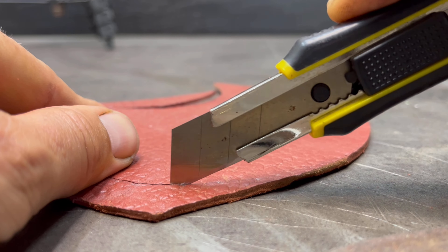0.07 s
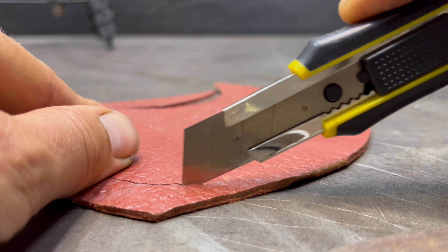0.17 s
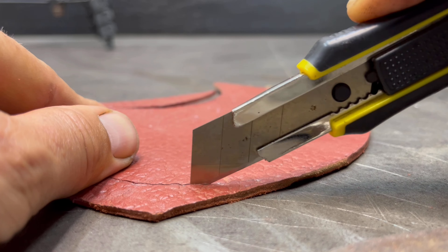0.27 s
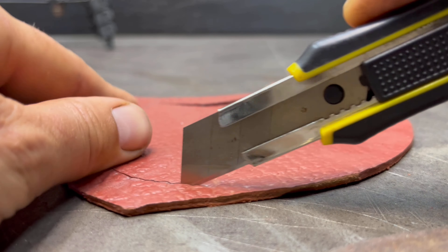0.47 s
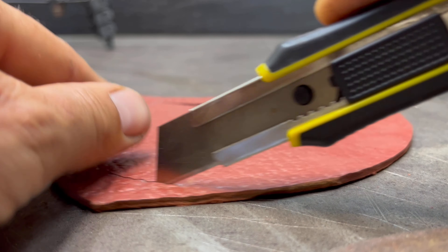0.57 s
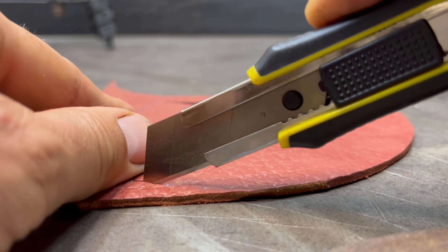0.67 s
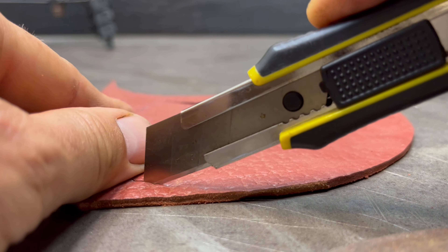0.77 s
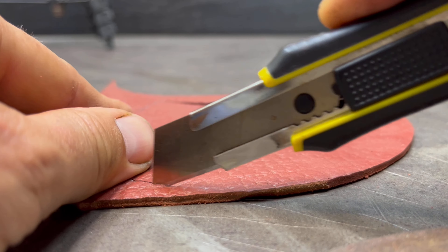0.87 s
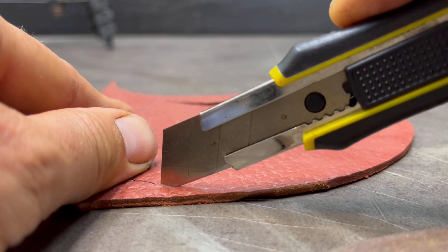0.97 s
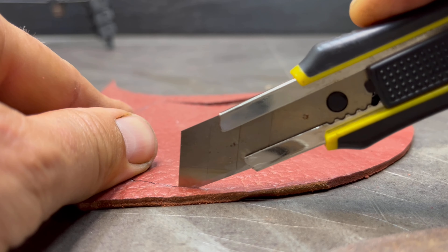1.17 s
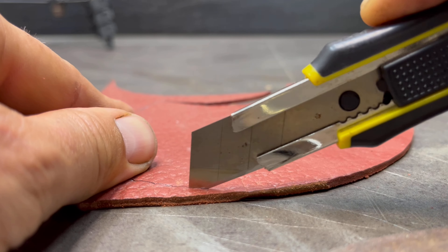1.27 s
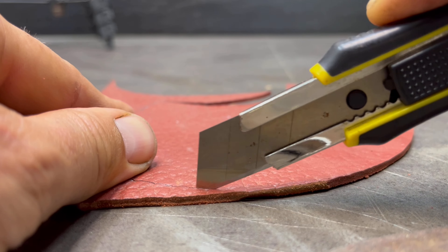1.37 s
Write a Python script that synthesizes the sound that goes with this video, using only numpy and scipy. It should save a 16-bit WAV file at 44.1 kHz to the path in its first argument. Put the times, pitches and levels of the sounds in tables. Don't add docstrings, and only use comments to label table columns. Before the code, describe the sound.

Leather being cut with a utility knife: gritty tearing strokes, hide sliding, a loud blade click

```python
import sys
import numpy as np
from scipy import signal
from scipy.fft import rfft, irfft
from scipy.io import wavfile
from scipy.ndimage import uniform_filter1d

SR = 44100
rng = np.random.default_rng(int(sys.argv[2]) if len(sys.argv) > 2 else 0)


def file_out(sig):
    cols = np.atleast_2d(sig).T
    lim = np.clip(cols, -1, 1)
    pcm = np.round(lim * 32767).astype(np.int16)
    wavfile.write(sys.argv[1], SR, pcm)


def elevation(decibels):
    levels = np.asarray(decibels, float)
    return 10 ** (levels / 20)


N = 61739
T = np.arange(N) / SR
F = np.fft.rfftfreq(N, 1 / SR)

# t/s, level/dB
HAND_WEIGHT = [(0.0, -63), (0.092, -55.5), (0.14, -71.5), (0.224, -49.5), (0.306, -51.5), (0.342, -65),
               (0.44, -49), (0.536, -81), (0.564, -48), (0.618, -79), (0.646, -50.5), (0.766, -59.5),
               (0.786, -53), (0.89, -66.5), (1.164, -50), (1.226, -62.5), (1.3, -54), (1.4, -57)]
# f/Hz, level/dB
BENCH_BODY = [(35, -24), (60, -2), (184, -4), (528, -23.5), (670, -18.5), (777, -45), (900, -21.5),
              (1170, -72), (1980, -120)]
# f/Hz, level/dB
HUM_SPECTRUM = [(20, -31), (35, -22), (52, 5), (75, -4.5), (120, -14.5), (300, -24), (1000, -37.5),
                (16000, -60)]
# t/s, level/dB
CUT_EFFORT = [
    [(0.0, -86), (0.024, -85), (0.07, -75), (0.074, -82.5), (0.114, -73.5), (0.124, -84), (0.14, -76)],
    [(0.14, -88), (0.174, -66), (0.26, -61.5), (0.272, -76.5), (0.346, -82), (0.366, -69), (0.41, -89)],
    [(0.845, -62.5), (0.871, -68.5), (0.945, -59), (0.987, -62), (1.007, -68), (1.021, -90.5), (1.04, -100)],
    [(1.04, -91), (1.054, -89), (1.064, -72), (1.112, -58), (1.162, -65), (1.19, -93), (1.21, -95)],
    [(1.21, -101), (1.23, -83), (1.238, -74.5), (1.258, -65), (1.322, -64.5), (1.348, -76.5), (1.4, -65.5)],
]
# t/s, level/dB
DRAG_EFFORT = [
    [(0.4, -105), (0.424, -65), (0.456, -52.5), (0.494, -48), (0.538, -56.5), (0.55, -52.5), (0.566, -57.5),
     (0.68, -56.5), (0.715, -69)],
    [(0.715, -81), (0.729, -58), (0.739, -68), (0.749, -49.5), (0.785, -109), (0.817, -83), (0.828, -51.5)],
]
# f/Hz, bandwidth/Hz, level/dB
FIRST_GRIP = [(1407, 196, 4), (3430, 350, -0.5), (4430, 400, -12), (6340, 390, -8), (7500, 700, -6),
              (8900, 370, -5), (10100, 240, -21), (12130, 900, -10.5), (14900, 940, -14.5)]
# f/Hz, bandwidth/Hz, level/dB
SECOND_GRIP = [(1450, 166, 6.5), (2320, 430, -10), (2995, 260, -0.5), (4050, 370, -12.5),
               (6170, 520, -14.5), (7230, 570, -9.5), (9890, 550, -13), (12030, 290, -6.5)]
# f/Hz, level/dB
TEARING = [(400, -7.5), (900, -30), (2500, -16), (5000, -11), (8000, -14), (13000, -14.5), (16000, -19)]
# f/Hz, level/dB, t60/s
HOLDER_MODES = [(583, -19.5, 0.0096), (1516, 5.5, 0.016), (2003, -0.5, 0.016), (2540, -5.5, 0.009),
                (3030, 0, 0.012), (4690, 2.5, 0.011), (5550, -9.5, 0.0066), (6550, -15.5, 0.0035),
                (7440, -5, 0.0068), (8670, -2.5, 0.0044), (9710, 0, 0.018), (11700, -23, 0.017),
                (13760, -23, 0.0036)]
# t/s, peak level/dB, rattle decay/s, tilt/(dB per octave)
BLADE_CLICKS = [(0.063, -66.5, 0.0034, -13), (0.2565, -54, .002, -3), (0.258, -44.5, .002, 2.5),
                (0.4135, -54.5, 0.0014, 1), (0.433, -51.5, 0.0013, -15), (0.4756, -36, 0.0012, 3),
                (0.729, -54, 0.0056, -7), (0.7494, -32.5, 0.00081, -11), (0.761, -57, .002, 0),
                (0.7737, -53, .001, -4), (0.8291, -28.5, 0.0028, 9.5), (0.8329, -10, 0.0011, -0.5),
                (0.8359, -25, 0.00073, -5), (0.857, -52, 0.0034, -12), (1.367, -52.5, .001, 1),
                (1.372, -53, .001, 11)]
# t/s, peak level/dB, f/Hz, t60/s
HANDLE_KNOCKS = [
    (.296, -52.5, 915, 0.026),
    (0.4852, -31.5, 1361, 0.028),
    (.516, -46, 1050, 0.011),
    (0.5488, -45, 1444, 0.026),
    (0.594, -56, 1386, 0.022),
    (0.669, -45, 490, 0.016),
]
# f/Hz, level/dB
HIDE_HISS = [(300, -2), (900, -3), (1450, -5.5), (2000, -6), (4500, -1.5), (5500, -8.5), (12500, -8.5),
             (16000, -8)]
# f/Hz, phase/rad
PORT_LEAD = [(0, 0), (800, 1), (1300, -1.1), (2000, 0), (2800, 0.89), (5000, 0.96), (5500, -1.4),
             (6800, -1.1), (8300, -3.14), (11300, -6.28), (12800, -6.4), (14600, -9.2), (16000, -9.5)]
# f/Hz, level/dB
PORT_TILT = [(100, -0.5), (950, 1), (1450, -6), (2100, 1.5), (4100, 4), (5200, 0.5), (7000, 1), (7800, 0)]
# f/Hz, share/(0 to 1)
PORT_ALIKE = [(200, .95), (950, 0.3), (1500, 0.64), (2600, 0.49), (5200, 0.32), (8300, 1), (10300, 0.83),
              (12000, 0.94), (13700, 0.48), (15300, 0.97)]


def colour(x, points):
    hz, db = np.transpose(points)
    gain = elevation(np.interp(np.log(F + 1), np.log(hz), db))
    return irfft(rfft(x) * gain, N)


def ring(x, hz, width_hz):
    b, a = signal.iirpeak(hz, hz / width_hz, SR)
    return signal.lfilter(b, a, x)


def unit(x):
    return x / np.sqrt(np.mean(x ** 2))


def walk(rate_hz):
    hold = int(SR / rate_hz)
    steps = np.repeat(rng.standard_normal(N // hold + 1), hold)
    smooth = uniform_filter1d(uniform_filter1d(steps, hold), hold)
    return 1.37 * smooth[:N]


def effort(curves):
    levels = [np.interp(T, *np.transpose(c), left=-140, right=-140) for c in curves]
    return np.max(levels, axis=0)


def grains(scatter_db, snag_db):
    released = rng.random(N) < 9000 / SR
    scatter = scatter_db * rng.exponential(size=N)
    snag = snag_db * (walk(250) + walk(60.15))
    coarse = released * elevation(scatter + snag) * rng.standard_normal((2, N))
    fine = 0.29 * rng.standard_normal((2, N))
    return coarse + fine


def ports(paths, stray=1.0):
    lead, tilt, share = [np.interp(F, *np.transpose(t)) for t in (PORT_LEAD, PORT_TILT, PORT_ALIKE)]
    alike = 1 - stray * (1 - np.clip(share, 0, 1))
    common, other = rfft(paths) * np.sqrt([(1 + alike) / 2, (1 - alike) / 2])
    half = elevation(tilt / 2) * np.exp(0.5j * lead)
    left = (common + other) * half
    right = (common - other) / half
    return irfft(np.array([left, right]), N)


def bench():
    def follow(curves, db):
        return elevation(db + 0.79 * (effort(curves) + 57))

    push = follow(CUT_EFFORT, -52.5) + follow(DRAG_EFFORT, -69)
    push = uniform_filter1d(push * elevation(3.6 * walk(40.16)), size=300)
    rumble = unit(colour(rng.standard_normal((2, N)), BENCH_BODY)) * push
    hum = unit(colour(rng.standard_normal((2, N)), HUM_SPECTRUM)) * elevation(effort([HAND_WEIGHT]))
    return ports(rumble + hum)


def cut():
    fibres = grains(scatter_db=2, snag_db=1.5)

    def blade(grip):
        ringing = sum(elevation(db) * ring(fibres, hz, width_hz) for hz, width_hz, db in grip)
        return unit(ringing + colour(fibres, TEARING))

    regrip_s = 0.6
    tearing = np.where(T < regrip_s, blade(FIRST_GRIP), blade(SECOND_GRIP))
    return ports(tearing * elevation(effort(CUT_EFFORT) + 4))


def clicks():
    length = 2000
    out = np.zeros((2, N + length))
    t = T[:length]
    for start_s, db, decay_s, tilt_db in BLADE_CLICKS:
        onset = np.minimum(t / 0.00028, 1)
        rattle = rng.standard_normal((2, length)) * np.exp(-t / decay_s) * onset
        body = np.zeros((2, length))
        for hz, mode_db, t60 in HOLDER_MODES:
            gain = elevation(mode_db + tilt_db * np.log2(hz / 4000)) / np.sqrt(t60)
            body += gain * ring(rattle, hz, 2.54 / t60)
        start = int(start_s * SR)
        out[:, start:start + length] += body * elevation(db) / np.abs(body).max()
    return ports(out[:, :N], stray=0.12)


def knocks():
    out = np.zeros((2, N))
    for start_s, db, hz, t60 in HANDLE_KNOCKS:
        t = np.maximum(T - start_s, 0)
        rise = 1 - np.exp(-t / 0.0013)
        out[0] += 2 * elevation(db - 60 * t / t60) * rise * np.sin(2 * np.pi * hz * t)
    return ports(out, stray=0)


def slide():
    hiss = unit(colour(grains(scatter_db=2.22, snag_db=1.77), HIDE_HISS))
    return ports(hiss * elevation(effort(DRAG_EFFORT) + 3), stray=1.45)


def scene():
    return cut() + slide() + bench() + clicks() + knocks()


def top_cut(x):
    return signal.sosfilt(signal.butter(12, 16120, fs=SR, output="sos"), x)


def record(dry):
    return top_cut(dry)


dry = scene()
out = record(dry)
file_out(out)
```